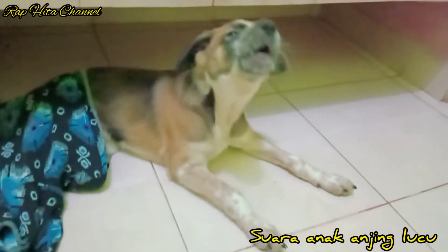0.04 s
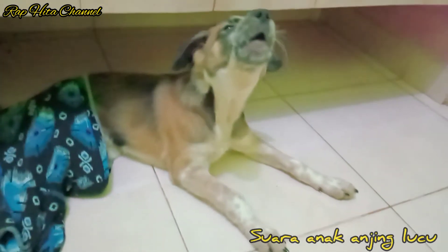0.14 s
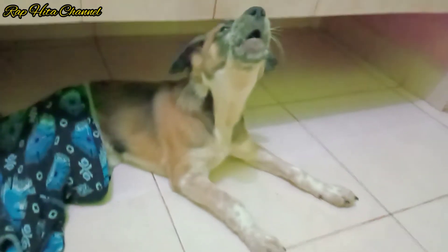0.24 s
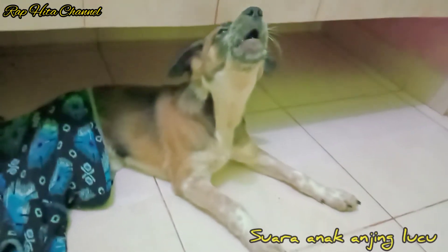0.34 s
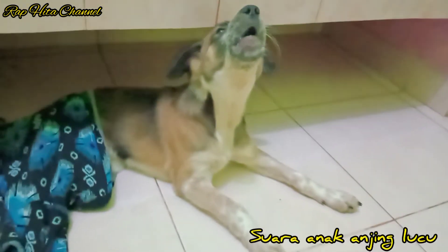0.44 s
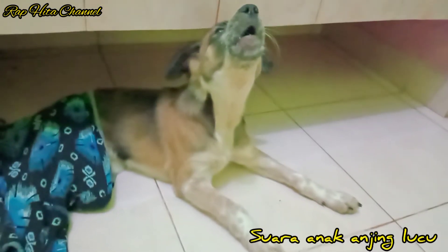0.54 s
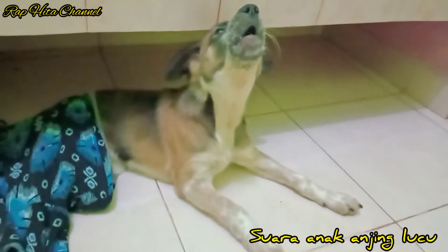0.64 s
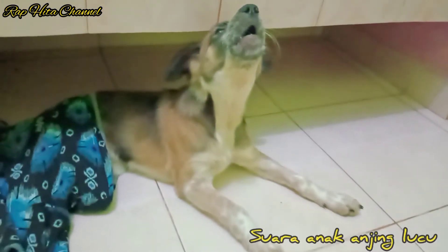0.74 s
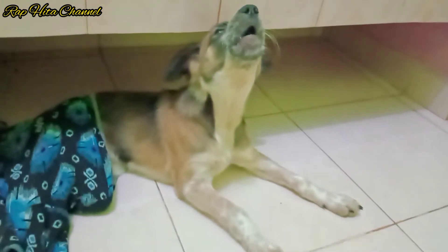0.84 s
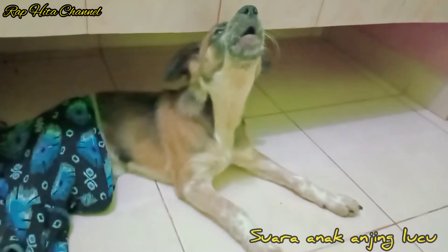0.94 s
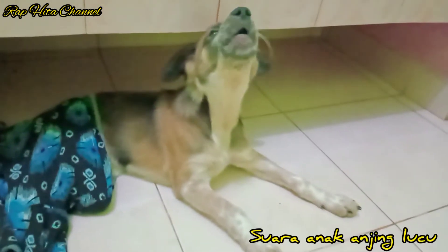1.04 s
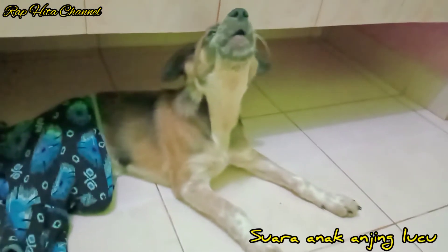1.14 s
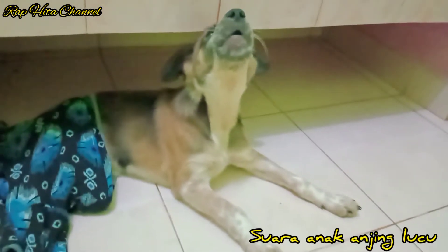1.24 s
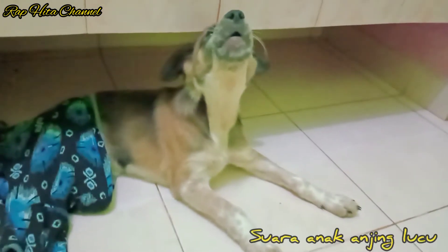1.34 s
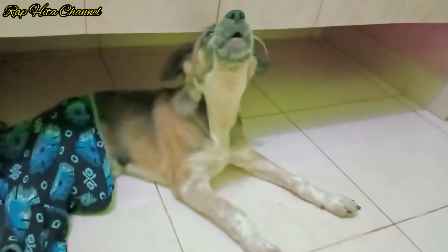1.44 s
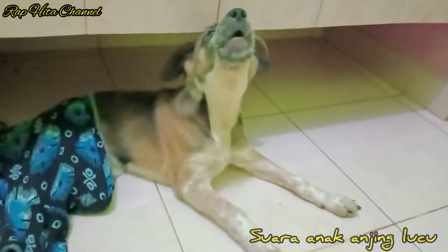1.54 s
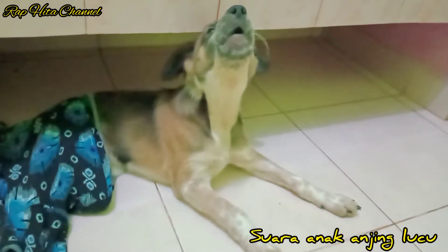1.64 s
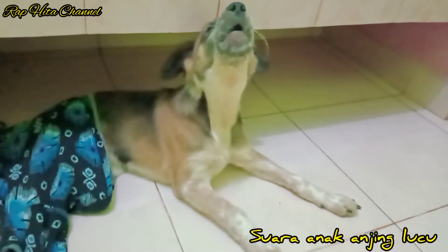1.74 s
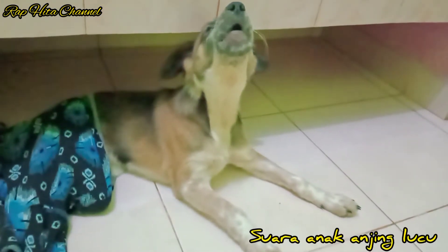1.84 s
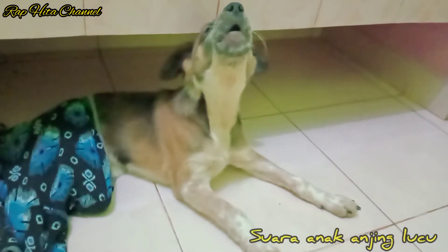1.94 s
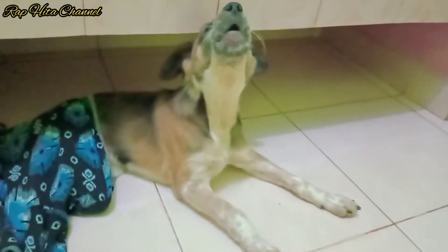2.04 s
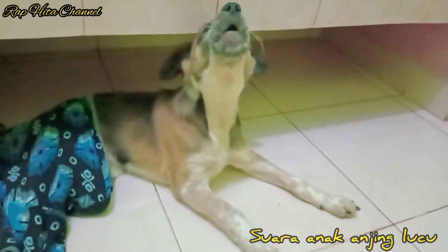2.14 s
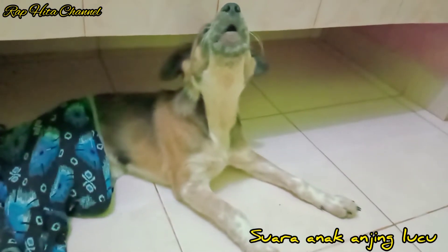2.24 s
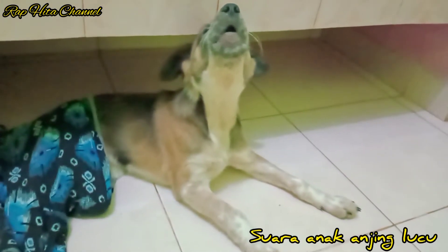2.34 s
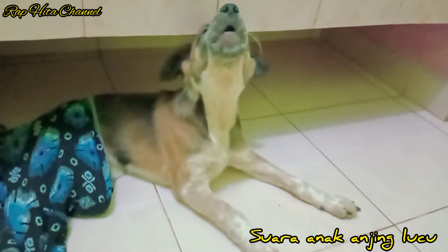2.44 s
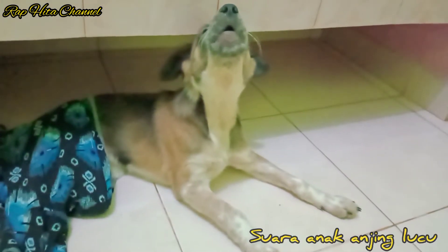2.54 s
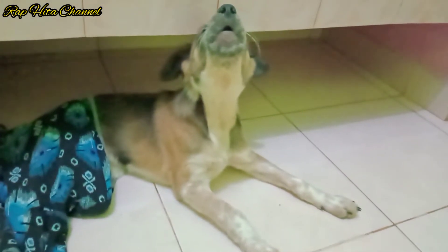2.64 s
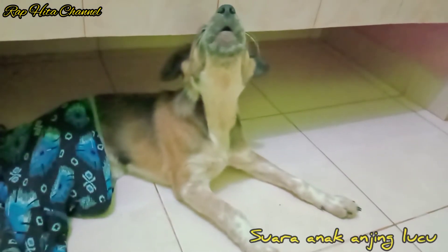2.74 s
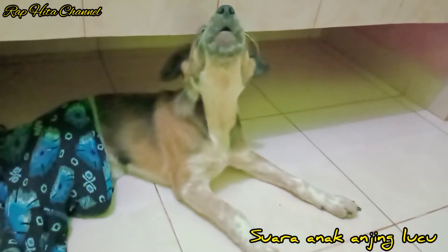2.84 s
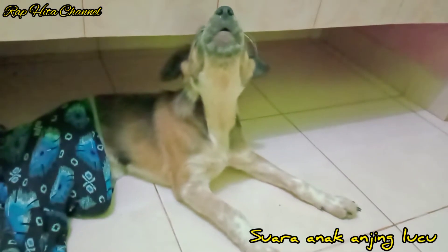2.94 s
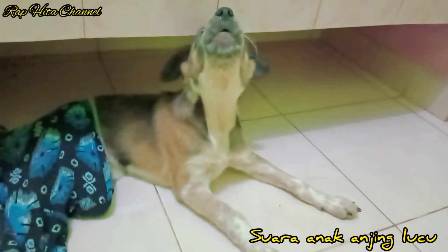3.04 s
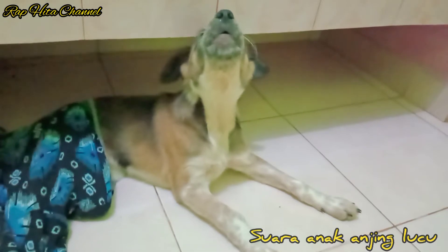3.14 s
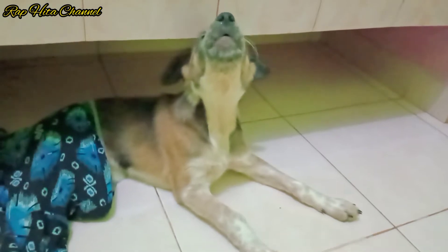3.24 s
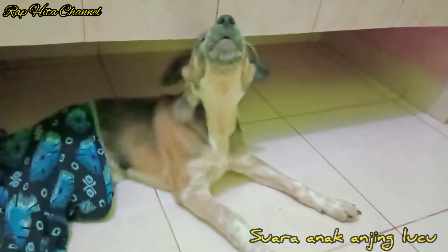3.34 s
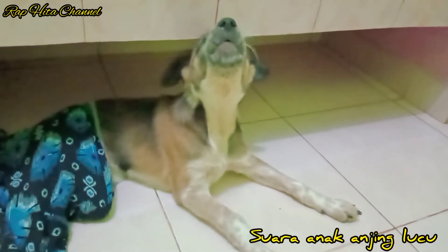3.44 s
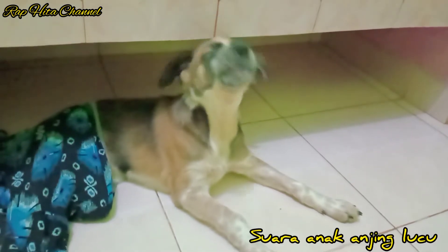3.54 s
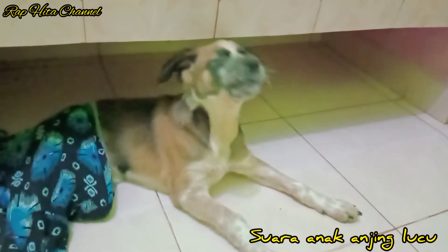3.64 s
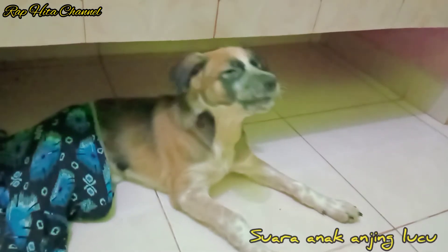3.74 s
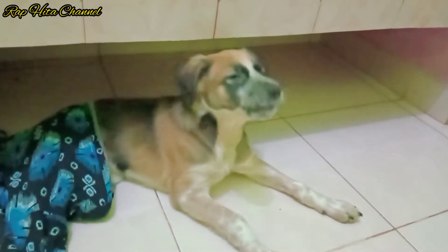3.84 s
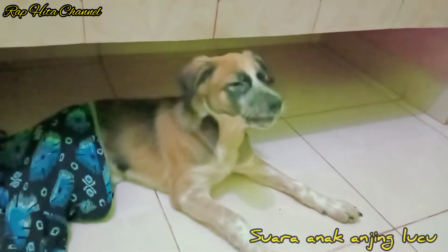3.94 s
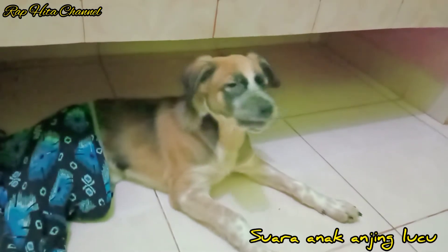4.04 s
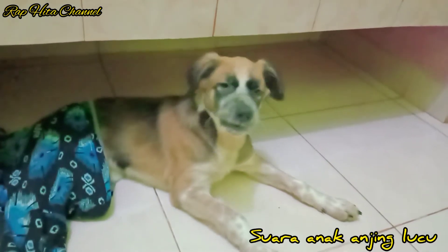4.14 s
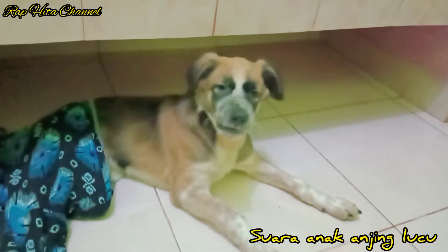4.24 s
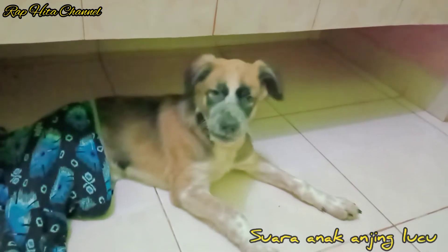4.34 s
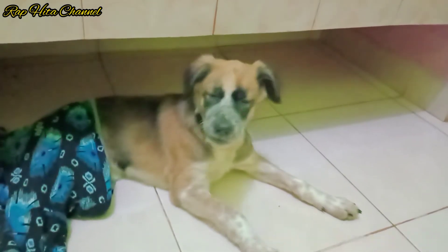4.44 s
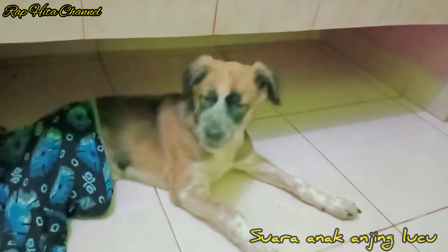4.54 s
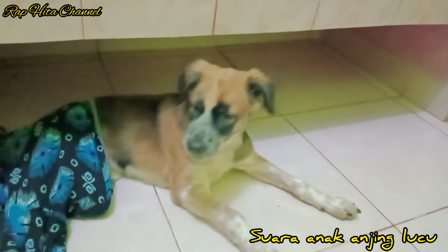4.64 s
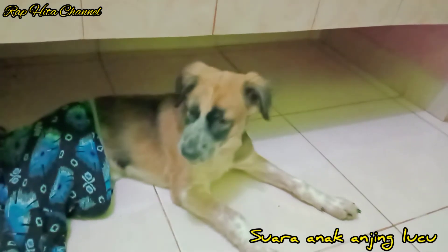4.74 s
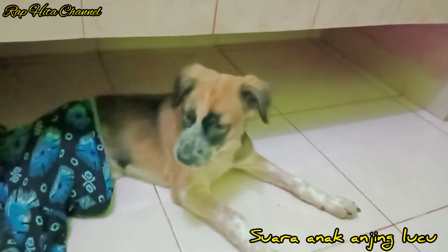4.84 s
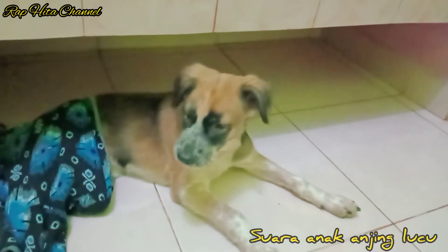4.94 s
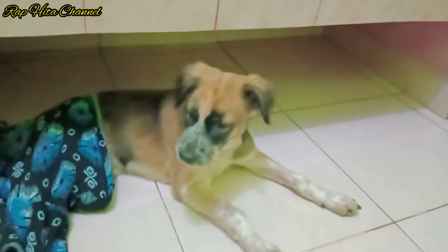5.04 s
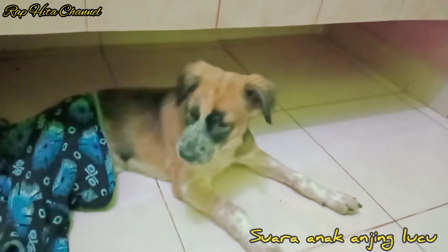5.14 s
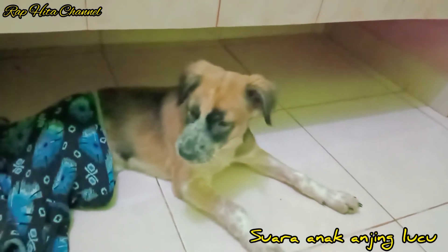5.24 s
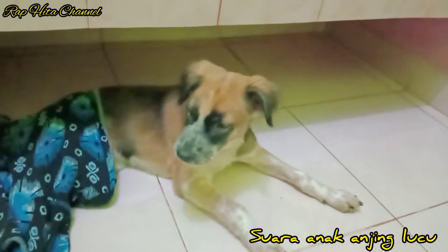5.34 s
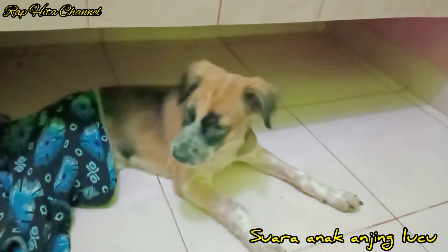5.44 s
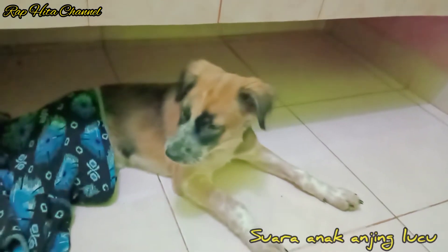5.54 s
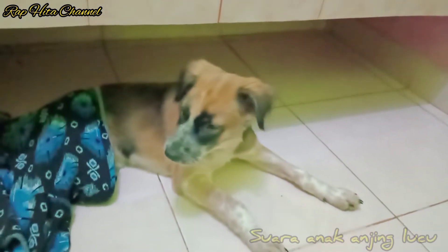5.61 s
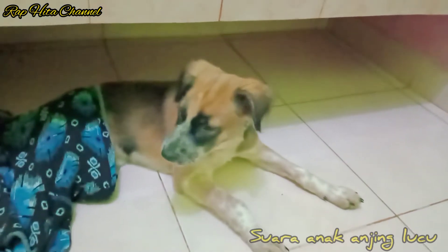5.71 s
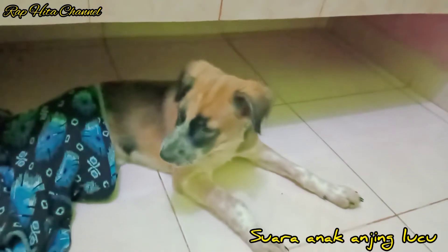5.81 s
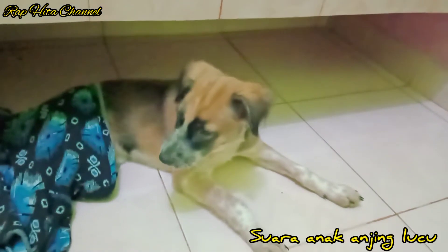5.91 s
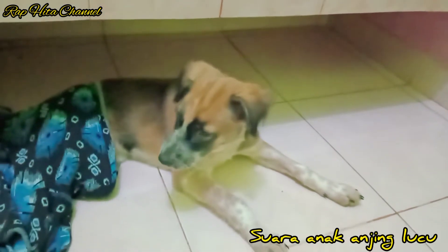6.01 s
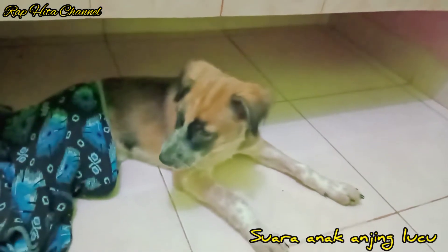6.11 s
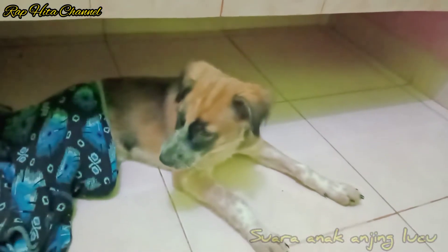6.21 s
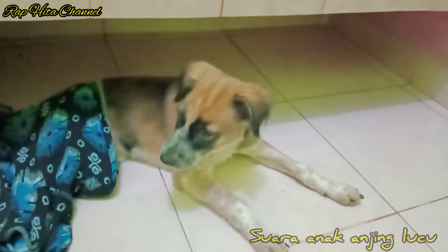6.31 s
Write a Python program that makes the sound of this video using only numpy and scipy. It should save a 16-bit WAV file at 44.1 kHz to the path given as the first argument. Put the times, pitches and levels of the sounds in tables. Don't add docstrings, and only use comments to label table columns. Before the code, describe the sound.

A puppy, close to a small microphone in a hard tiled room, ends a short falling howl, then sings a long howl that rises, slowly falls and sinks into a closed-mouth moan. After a pause come five short, nasal whines, each starting with a thin high whistle and sliding down. The last wobbles and swings up into another loud howl, cut off at the end. A faint low household hum swells in the gaps.

```python
import sys
import numpy as np
from scipy import signal
from scipy.fft import rfft, irfft
from scipy.io import wavfile
from scipy.ndimage import uniform_filter1d

SR = 44100
rng = np.random.default_rng(int(sys.argv[2]) if len(sys.argv) > 2 else 0)


def to_wav(s):
    ch = np.atleast_2d(s).T
    pcm = np.round(np.clip(ch, -1, 1) * 32767)
    wavfile.write(sys.argv[1], SR, pcm.astype(np.int16))


def magnitude_from_level(level_db):
    exponent = np.asarray(level_db, float) / 20
    return 10 ** exponent


N = 280917


def evened(x):
    return x / np.sqrt(np.mean(x ** 2) + 1e-20)


def read(points, hz):
    f, value = np.transpose(points)
    return np.interp(np.log(hz + 1), np.log(f + 1), value)


def coloured(points):
    spectrum = rfft(rng.standard_normal(N))
    colour = magnitude_from_level(read(points, np.fft.rfftfreq(N, 1 / SR)))
    return evened(irfft(spectrum * colour, N))


def wander(hz):
    return evened(signal.lfilter(*signal.butter(2, hz, fs=SR), rng.standard_normal(N)))


def controls(tables, rise_s, fall_s):
    s, *columns = np.concatenate(tables).T
    t = np.arange(N) / SR
    gate = np.zeros(N)
    for call in tables:
        opening = np.clip((t - call[0][0]) / rise_s + 0.5, 0, 1)
        closing = np.clip((call[-1][0] - t) / fall_s + 0.5, 0, 1)
        gate += opening * closing
    return gate ** 2, [np.interp(t, s, column) for column in columns]


# frequency in Hz, level in dB per Hz.
RUMBLE = [(12, -57), (20, -18.5), (59, -12), (144, -4), (370, -6), (531, -11), (702, -7.5), (1160, -7.5),
          (1620, -15), (3060, -18.5), (5640, -40), (7250, -43), (15400, -62.5)]
# frequency in Hz, width of the waver in Hz, level in dB.
APPLIANCES = [(156.3, 12, -56.5), (245, 12, -50), (300.7, 13, -53)]


def hum(level_db=-46, lumpy_db=-1.0):
    t = np.arange(N) / SR
    tones = np.zeros(N)
    for hz, width_hz, db in APPLIANCES:
        tones += magnitude_from_level(db) * np.cos(2 * np.pi * hz * t) * (1 + 0.5 * wander(width_hz))
    return magnitude_from_level(level_db + lumpy_db * wander(6)) * coloured(RUMBLE) + tones


# frequency in Hz, time to die by 60 dB in seconds.
RING = [(250, 0.92), (500, 0.6), (1000, 0.59), (2000, 0.8), (3500, 0.53), (6500, 0.55), (12000, 0.22)]
# delay in seconds, gain.
ECHOES = [
    (.0021, 0.49),
    (.0063, -0.23),
    (.0098, 0.44),
    (.0141, -0.19),
]


def room(x, wet_db=-2, gap_s=0.006):
    taps = np.zeros(SR)
    at = np.arange(round(gap_s * SR), SR - 20, 20)
    scattered = at + rng.integers(0, 20, len(at))
    taps[scattered] = rng.choice([-1.0, 1.0], len(at))
    hz, t, z = signal.stft(taps, SR, nperseg=256)
    decay = magnitude_from_level(-60 * t / read(RING, hz)[:, None])
    tail = signal.istft(z * decay, SR, nperseg=256)[1]
    response = magnitude_from_level(wet_db) * tail / np.linalg.norm(tail)
    response[0] += 1
    for delay_s, gain in ECHOES:
        response[round(delay_s * SR)] += gain
    return signal.fftconvolve(x, response / np.linalg.norm(response))[:N]


# time in seconds, pitch in Hz, level in dB.
WHISTLES = [
    [(3.182, 5980, -52), (3.24, 6100, -46), (3.26, 6370, -41), (3.31, 6310, -47), (3.4, 6220, -42),
     (3.5, 6230, -43), (3.62, 6250, -50)],
    [(4.062, 6030, -51), (4.1, 5984, -49), (4.157, 6140, -49), (4.22, 6120, -56)],
    [(4.552, 6130, -49), (4.6, 5980, -50), (4.64, 6040, -48), (4.7, 6000, -54)],
    [(5.076, 6400, -39), (5.13, 6340, -33), (5.17, 6560, -30), (5.23, 6340, -36), (5.32, 6260, -45),
     (5.42, 6300, -52)],
    [(5.745, 6440, -36), (5.775, 7000, -34), (5.82, 6400, -38), (5.855, 6850, -42), (5.9, 6480, -46),
     (5.98, 6400, -47), (6.12, 6400, -64)],
]
BLOWN_DB = [0.1, 0.1, 0.1, 0.1, 0.1]
# octave under the tone in dB, sidebands under the tone in dB, air hiss in dB.
NOSE = [
    (-2.5, -2, -49.5),
    (-5, -10, -52.5),
    (-6, -28.5, -50.5),
    (-35.5, -10.5, -62.5),
    (-49, -14.5, -65),
]
# frequency in Hz, level in dB per Hz.
AIR = [(1500, -6), (3300, 18), (4600, 8), (5600, -26), (7600, 5.5), (9900, -15.5), (12400, 0),
       (15500, -15.5)]


def whistle(folds, folds_on, jitter=0.0012, lower_db=-28, far_db=-12, puff_db=-8):
    octave_fade_db_per_s, air_fade_db_per_s = -110, -8.5
    gust_db = 2
    tables = []
    for curve, blown_db, (octave_db, side_db, air_db) in zip(WHISTLES, BLOWN_DB, NOSE):
        rows = []
        for s, hz, level_db in curve:
            age_s = s - curve[0][0]
            octave_now_db = octave_db + octave_fade_db_per_s * age_s
            air_now_db = air_db + air_fade_db_per_s * age_s
            rows.append((s, hz, level_db + blown_db, octave_now_db, side_db, air_now_db))
        tables.append(rows)
    gate, (hz, level_db, octave_db, side_db, air_db) = controls(tables, 0.014, 0.2)
    phase = 2 * np.pi * np.cumsum(hz * (1 + jitter * wander(87))) / SR
    tone = np.sin(phase) + magnitude_from_level(octave_db) * np.sin(2 * phase)
    sides = np.sin(phase + folds)
    sides += magnitude_from_level(lower_db) * np.sin(phase - folds) + magnitude_from_level(far_db) * np.sin(phase + 2 * folds)
    voiced = magnitude_from_level(level_db) * (tone + folds_on * magnitude_from_level(side_db) * sides)
    puffs = 1 + folds_on * magnitude_from_level(puff_db) * (1 + np.cos(folds)) ** 2
    hiss = magnitude_from_level(air_db + gust_db * wander(25)) * puffs * coloured(AIR)
    return np.sqrt(2) * gate * (voiced + hiss)


# frequency in Hz, level in dB.
THROAT = [(560, -34), (1300, -17), (1600, -19.5), (1890, -23.5), (2650, -10.5), (3300, -10), (4150, -38.5),
          (5000, -41.5), (5700, -75.5), (7000, -50), (8260, -37.5), (8880, -55.5), (10400, -55),
          (12800, -45), (15400, -87.5)]
# time in seconds, pitch in Hz, effort in dB, strain in dB that brightens the folds,
# mouth opening from 0 to 1.
FIRST_HOWL = [
    (0.0, 1040, -4.5, -21.5, .8),
    (.054, 1065, -18.5, -24.5, .8),
    (.174, 892, -14.5, -13, .6),
    (.26, 844, -15, -17, .5),
    (.294, 710.4, -6.5, -29.5, .4),
    (.344, 677, -23.5, -16, .3),
    (.37, 658, -25, -19, .3),
]
LONG_HOWL = [
    (.74, 638.8, -7, -21, .8),
    (0.791, 803.6, -11.5, -16, 0.66),
    (.91, 879.6, -9.5, -13.5, 1),
    (.95, 983, -16, -12.5, 0.71),
    (1.099, 1018, -9.5, -12.5, 0.59),
    (1.289, 986.6, -15.5, -15.5, 0.92),
    (1.32, 941.2, -15, -9, 0.77),
    (1.53, 906, -13, -15.5, 0.64),
    (2.031, 650, -6, -13.5, 0.95),
]
MOAN = [
    (2.239, 648, -9, -15, 0.93),
    (2.291, 590, -22, 4, 0.37),
    (2.37, 523, -25, 1.5, 0.26),
    (2.459, 499, -25, -2.5, 0.25),
    (2.602, 526, -22.5, -1, 0.28),
    (2.71, 528, -17.5, -12, 0.25),
    (2.849, 535, -41.5, 2.5, 0.091),
]
WAVY_WHINE = [
    (3.236, 856, -26.5, 6, 0.32),
    (3.253, 794, -10, -25, 0.14),
    (3.307, 698, -17, -11.5, 0.19),
    (3.379, 721, -19.5, -9, 0.14),
    (3.441, 815.3, -8, -20.5, .2),
    (3.491, 754.5, -10, -15, 0.11),
    (3.56, 714, -33.5, 7, 0.16),
    (3.622, 625.3, -21.5, -2, 0.13),
    (3.733, 554, -29.5, -2, 0.1),
]
SHORT_WHINE = [
    (4.151, 760, -27.5, -19, .4),
    (4.21, 618.4, -30, -4.5, .2),
    (4.275, 535.7, -30.5, -3.5, .1),
    (4.29, 476, -23.5, -17.5, .1),
    (4.309, 285.7, -41, -13, .1),
]
DROOPING_WHINE = [
    (4.622, 825, -27.5, -4, 0.77),
    (4.674, 610.2, -23, -15.5, 0.5),
    (4.701, 552, -27.5, -7, 0.35),
    (4.792, 534.6, -31.5, -0.5, 0.28),
    (4.834, 421.9, -15.5, -21, 0.058),
    (4.856, 351.4, -31, -12, 0.051),
    (4.874, 250.8, -26, -8, 0.068),
]
HIGH_WHINE = [
    (5.17, 931.3, -40.5, -3.5, 0.24),
    (5.22, 874.4, -40, 1, 0.14),
    (5.284, 908.7, -22, -8.5, 0.1),
    (5.358, 893, -33.5, 2, 0.21),
    (5.429, 741.6, -31.5, -3, 0.1),
    (5.5, 573.2, -28, -27, 0.23),
    (5.56, 406.3, -29.5, -1, 0.033),
]
WOBBLING_WHINE = [
    (5.763, 1032, -26, 3.5, 0.75),
    (5.785, 1118, -18.5, 1.5, 0.56),
    (5.82, 1069, -32, 1, 0.48),
    (5.861, 789, -38, 1, 0.33),
    (5.93, 856.3, -34, 0.5, 0.17),
    (5.96, 921.3, -38.5, 7.5, 0.3),
    (6.03, 870.5, -32, -0.5, 0.37),
    (6.095, 989.3, -34, 2.5, 0.19),
    (6.13, 1002, -34, 0.5, 0.44),
]
NEW_HOWL = [
    (6.144, 1051, -17, -5, .85),
    (6.19, 1077, -15, -6, 0.48),
    (6.235, 1073, -17, -24.5, 1),
    (6.258, 956.6, -13.5, -13, 1),
    (6.37, 904.2, -18, -10.5, 0.76),
]
HELD_END = [(1 + N / SR, *NEW_HOWL[-1][1:])]
BREATHS = [FIRST_HOWL, LONG_HOWL + MOAN, WAVY_WHINE, SHORT_WHINE, DROOPING_WHINE, HIGH_WHINE,
           WOBBLING_WHINE + NEW_HOWL + HELD_END]


def voice(jitter=0.0023, shimmer_db=1.52, breath_db=-46, haze_db=-45):
    shut_hz, open_hz, mouth_width_hz = 895, 2254, 279
    gate, (hz, effort_db, strain_db, mouth) = controls(BREATHS, 0.011, 0.019)
    phase = 2 * np.pi * np.cumsum(hz * (1 + jitter * wander(40))) / SR
    upper_db = effort_db + strain_db
    mouth_hz = shut_hz + (open_hz - shut_hz) * mouth
    mouth_db = 19.5 + 5 * (2 * mouth - 1)
    taut_db = 19 * np.log2(hz / 774)
    flutter = wander(18)
    sound = magnitude_from_level(effort_db) * np.sin(phase)
    for k in range(2, 26):
        harmonic_hz = k * hz
        lift_db = mouth_db * np.exp(-((harmonic_hz - mouth_hz) / mouth_width_hz) ** 2)
        if k == 2:
            lift_db += 4 + 10 * mouth
        lift_db += taut_db / (1 + (4270 / harmonic_hz) ** 6)
        lift_db += 0.9 * np.sqrt(k - 2) * np.roll(flutter, k * N // 26)
        level = magnitude_from_level(upper_db + lift_db + read(THROAT, harmonic_hz))
        sound += level * (harmonic_hz < 15500) * np.sin(k * phase)
    leak = 1 + np.cos(phase)
    puffs = magnitude_from_level(breath_db) * leak * coloured(THROAT) * magnitude_from_level(upper_db + 19.0)
    haze = signal.lfilter(*signal.butter(4, 6500, "high", fs=SR), coloured(THROAT))
    puffs += magnitude_from_level(upper_db + taut_db + haze_db) * leak * evened(haze)
    sung = np.sqrt(2) * gate * magnitude_from_level(shimmer_db * wander(32)) * (sound + puffs)
    return sung, phase, gate


def scene():
    sung, folds, folds_on = voice()
    puppy = sung + whistle(folds, folds_on)
    return (magnitude_from_level(4.5) * room(puppy) + hum())[None]


def roll_off(x):
    return signal.sosfilt(signal.butter(12, 15500, fs=SR, output="sos"), x)


def record(dry):
    power_db = 10 * np.log10(abs(uniform_filter1d(dry[0] ** 2, 900)) + 1e-12)
    recovery_db = np.arange(N) * 34.0 / SR
    held_db = np.maximum.accumulate(power_db + recovery_db) - recovery_db
    over_db = np.maximum(held_db + 21, 0)
    cut_db = uniform_filter1d(0.56 * over_db, 400)
    rate = 1 / (0.6 * SR)
    lingering_db = signal.lfilter([rate], [1, rate - 1], cut_db, zi=[5.0])[0]
    cut_db += 0.52 * lingering_db
    stepped_db = uniform_filter1d(np.round(cut_db / 0.75) * 0.55, 30)
    x = dry / magnitude_from_level(stepped_db)
    squash = signal.lfilter(*signal.butter(2, 250, "high", fs=SR), x - 0.97 * np.tanh(x / 0.98))
    return roll_off(1.112 * (x - squash))


dry = scene()
out = record(dry)
to_wav(out)
```